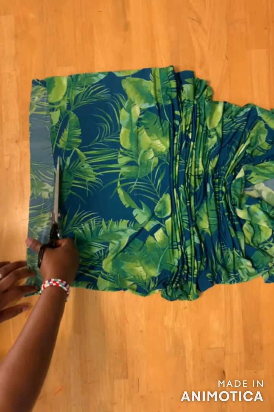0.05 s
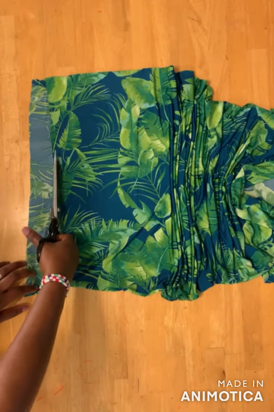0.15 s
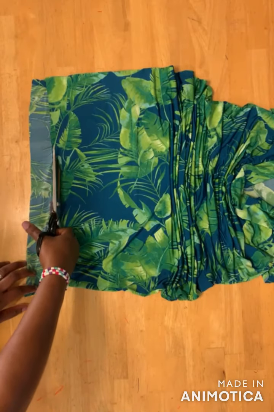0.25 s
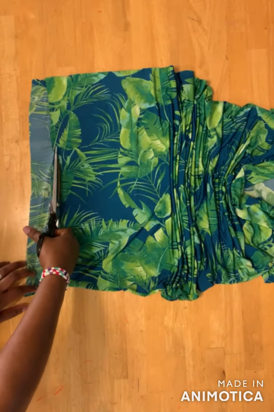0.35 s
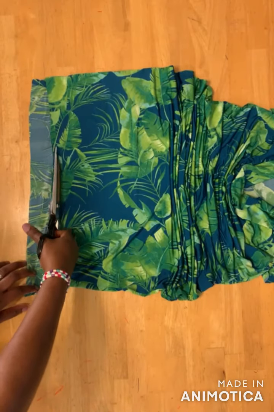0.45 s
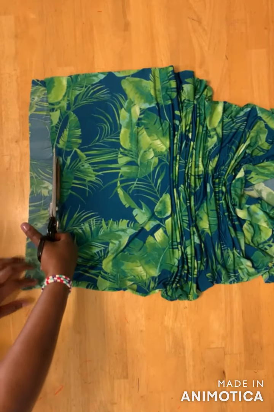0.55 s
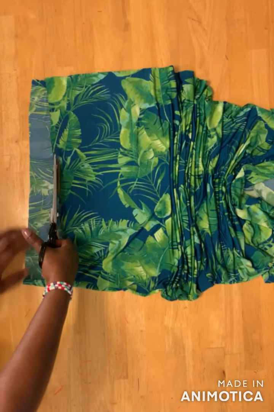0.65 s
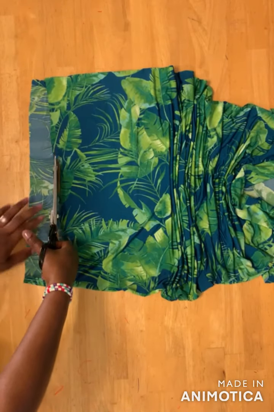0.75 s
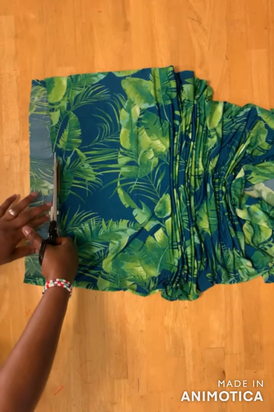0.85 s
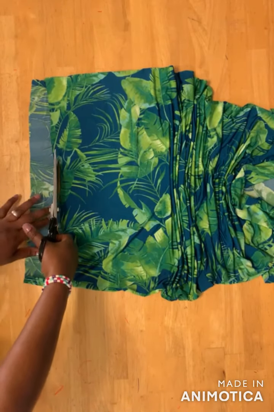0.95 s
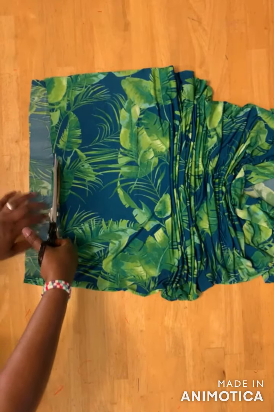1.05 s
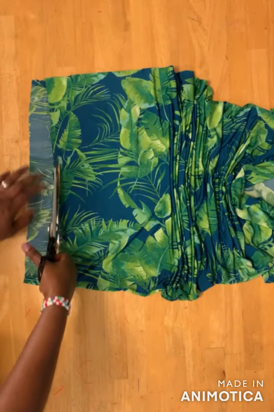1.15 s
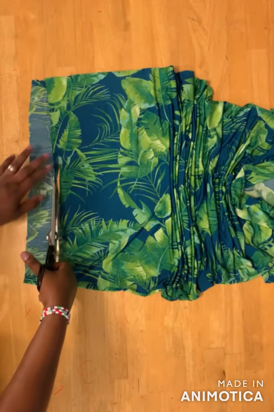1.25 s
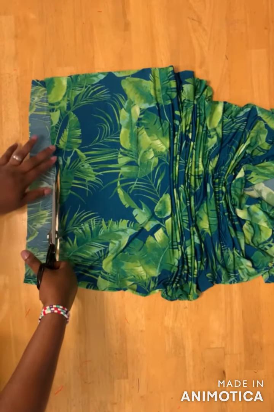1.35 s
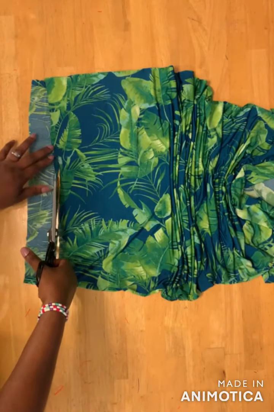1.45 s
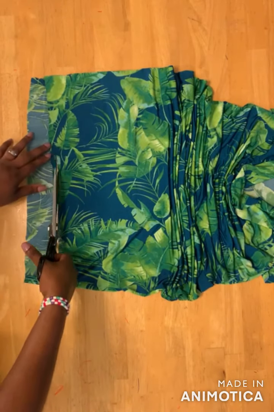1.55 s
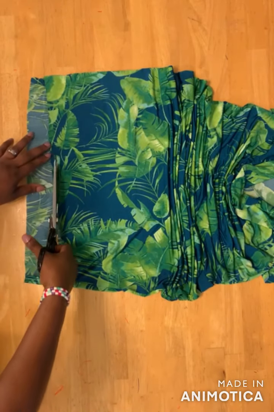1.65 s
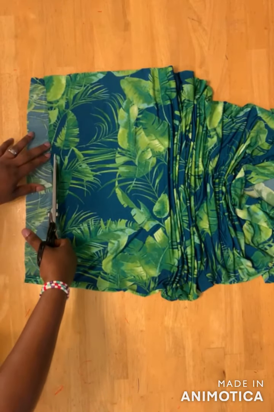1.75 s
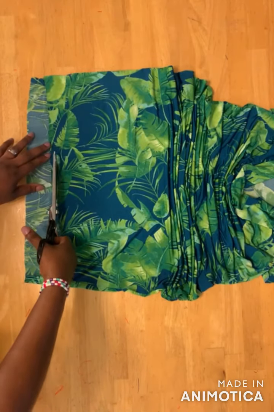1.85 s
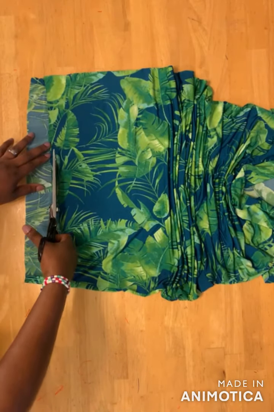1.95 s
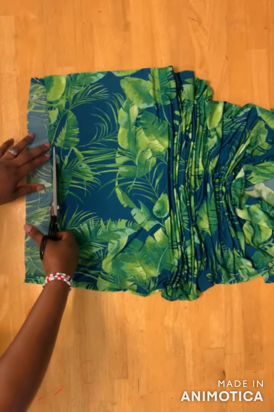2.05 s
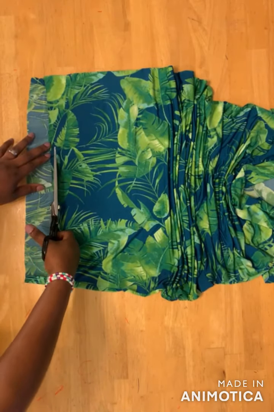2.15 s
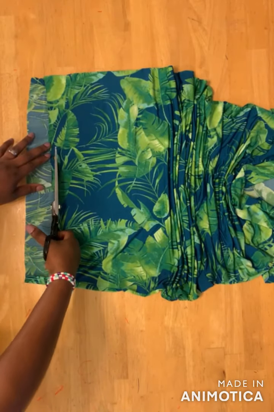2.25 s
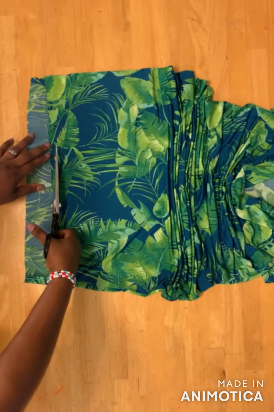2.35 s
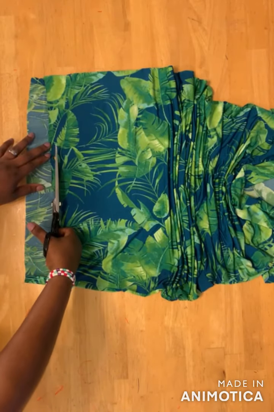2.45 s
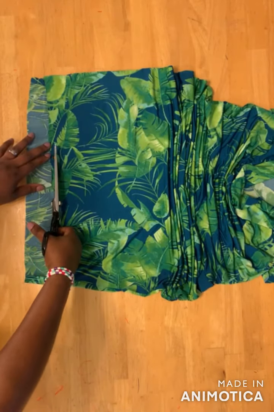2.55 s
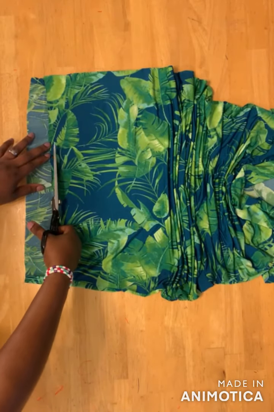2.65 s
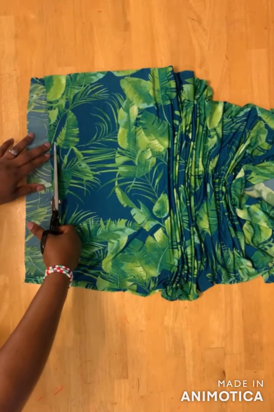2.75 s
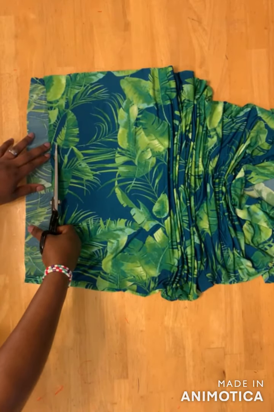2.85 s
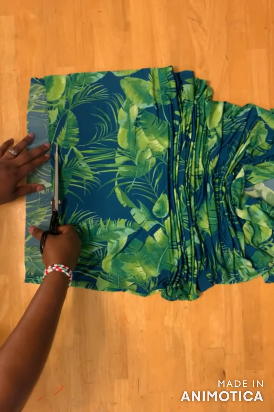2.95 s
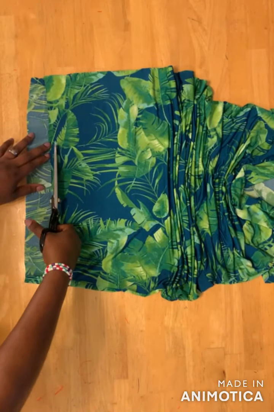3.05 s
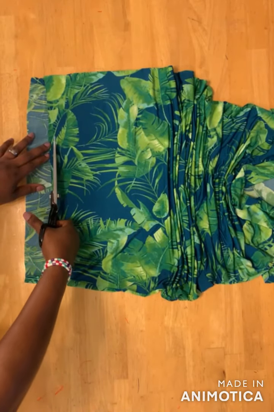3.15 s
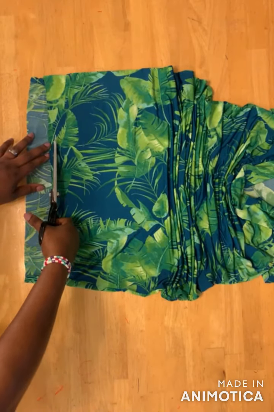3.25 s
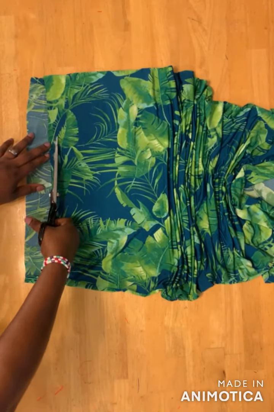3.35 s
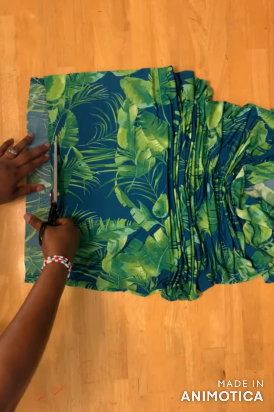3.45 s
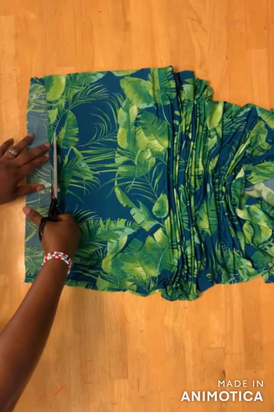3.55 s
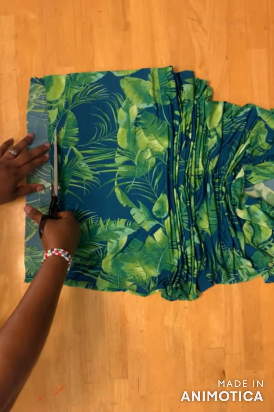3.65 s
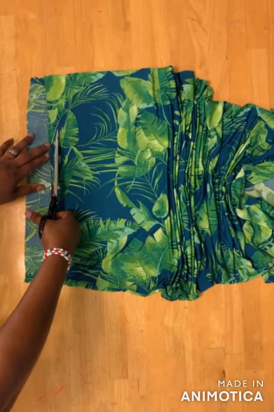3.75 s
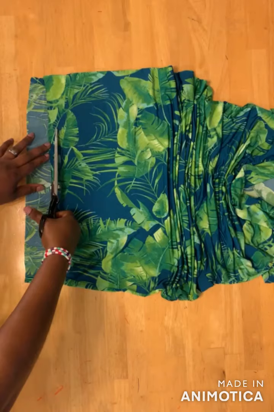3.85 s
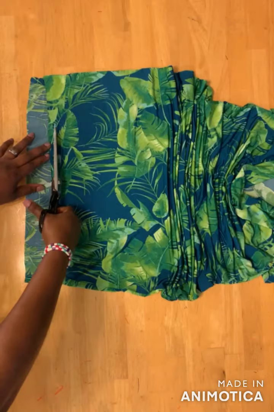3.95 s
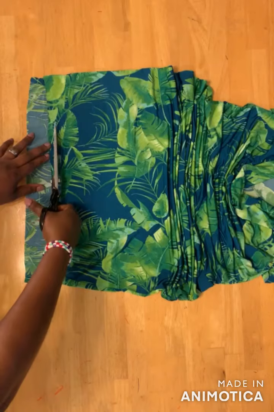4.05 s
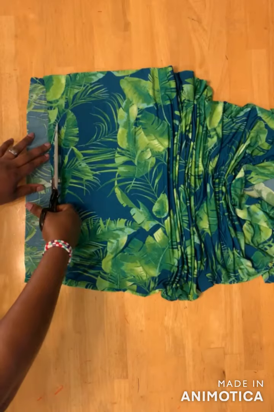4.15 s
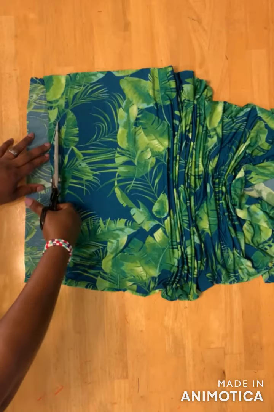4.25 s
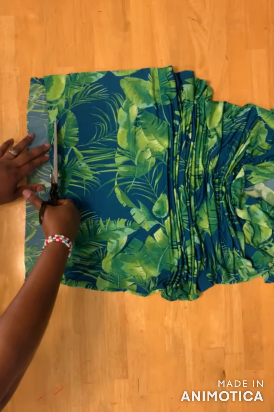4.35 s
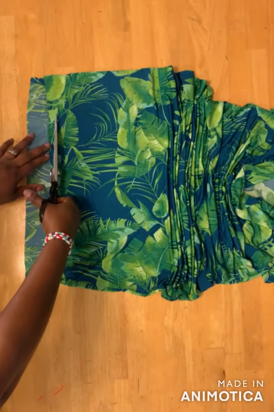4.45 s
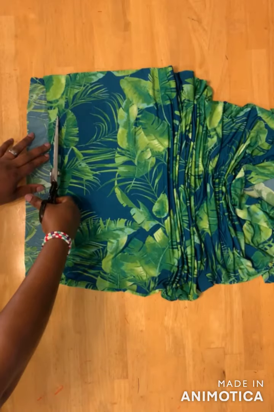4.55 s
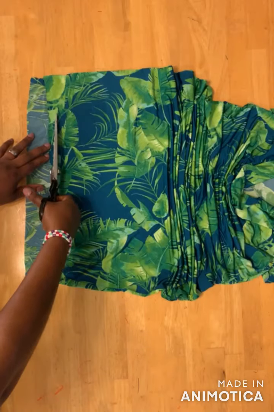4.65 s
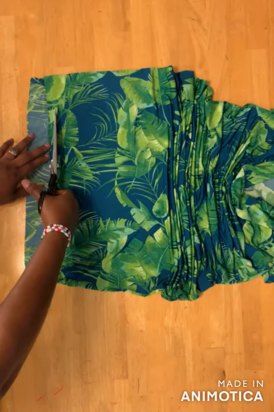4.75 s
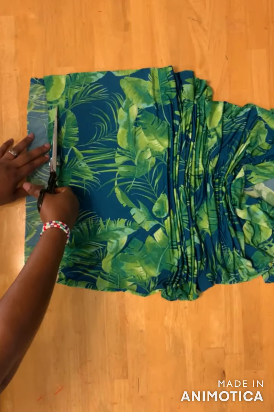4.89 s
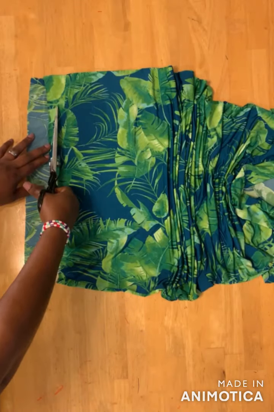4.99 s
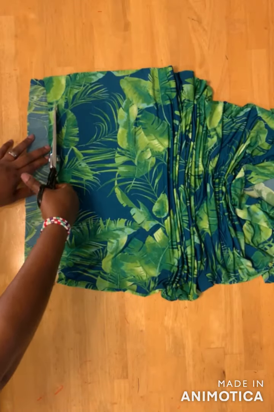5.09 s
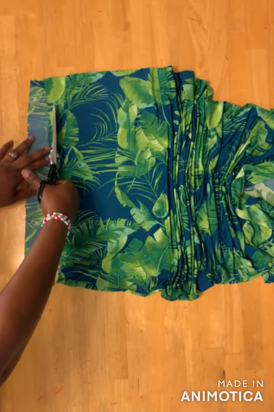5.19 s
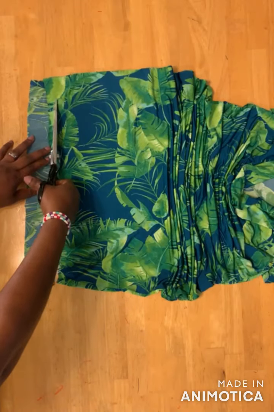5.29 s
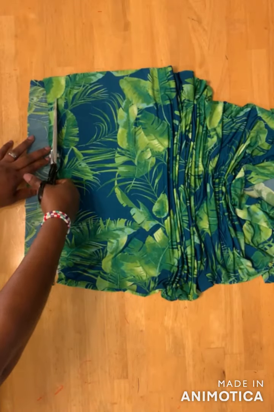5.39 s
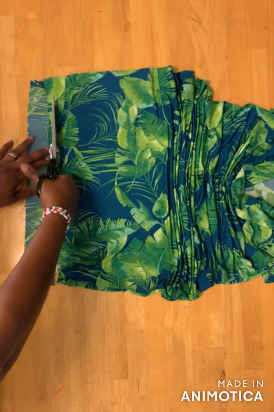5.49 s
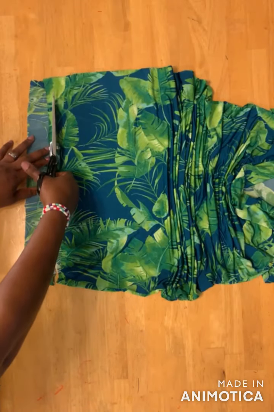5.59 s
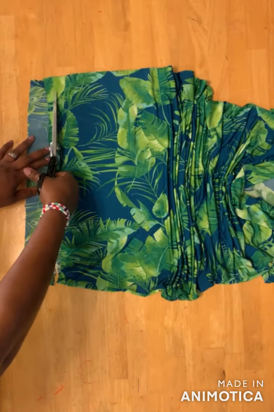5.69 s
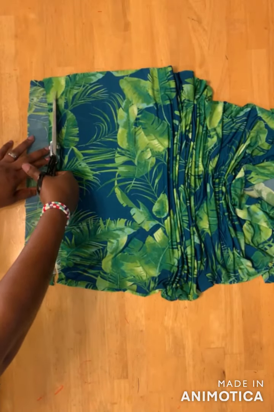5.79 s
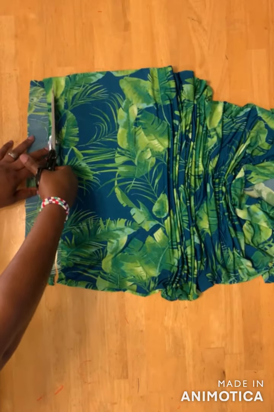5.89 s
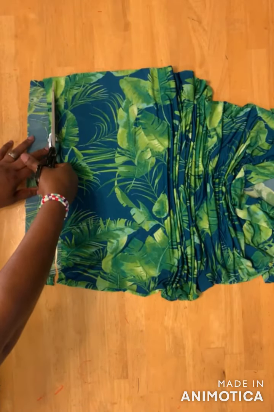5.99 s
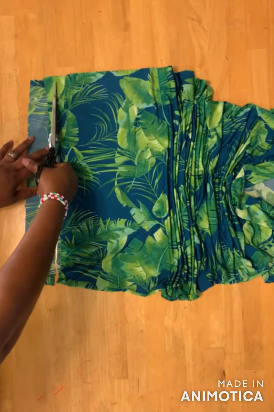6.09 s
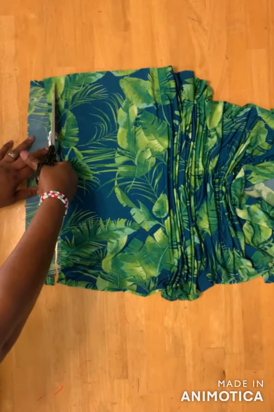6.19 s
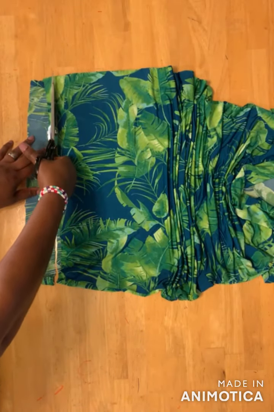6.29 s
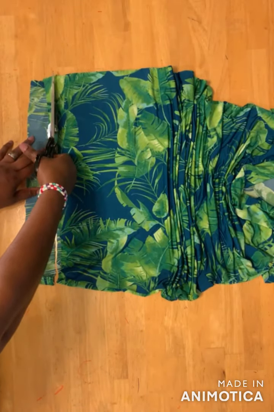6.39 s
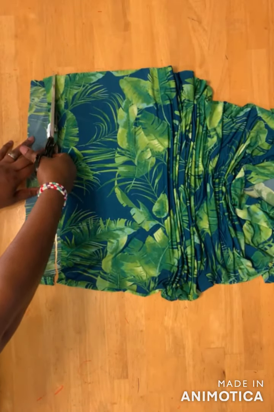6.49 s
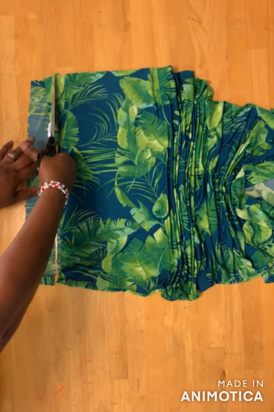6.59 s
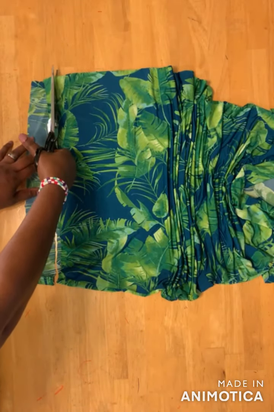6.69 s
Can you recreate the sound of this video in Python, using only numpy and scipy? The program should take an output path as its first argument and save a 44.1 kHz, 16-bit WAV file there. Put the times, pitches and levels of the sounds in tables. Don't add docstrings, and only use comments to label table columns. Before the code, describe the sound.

In a small hard room with a low appliance hum, a tiny metallic scrape is followed by soft hand bumps and faint cloth brushing. After about two seconds, long shears start cutting fabric on a wooden floor: gritty, jerky crunches with woody knocks, each reopening marked by a light pivot tick. Eleven or so strokes run evenly, and the last ends in a hard clack. Close stereo microphone, short room echo.

```python
import sys
import numpy as np
from scipy import signal
from scipy.fft import rfft, irfft, next_fast_len
from scipy.io import wavfile
from scipy.ndimage import uniform_filter1d, map_coordinates

SR = 44100
rng = np.random.default_rng(int(sys.argv[2]) if len(sys.argv) > 2 else 0)


def to_wav(s):
    ch = np.atleast_2d(s).T
    pcm = np.round(np.clip(ch, -1, 1) * 32767)
    wavfile.write(sys.argv[1], SR, pcm.astype(np.int16))


def invert_db(x):
    u = np.asarray(x, float) / 20
    return 10 ** u


N = 296793
TIME = np.arange(N) / SR

# start_s, hold_s, boards_db, blades_db, low_ring_db
CLOSINGS = [(2.314, 0.1, -34.5, -57, -45.5), (2.82, 0.027, -30.5, -46, -59),
            (3.24, 0.0089, -32.5, -46, -55), (3.635, 0.035, -35, -46.5, -43),
            (4.026, 0.019, -33, -47.5, -34), (4.422, 0.018, -34, -48, -42),
            (4.804, 0.013, -35.5, -48.5, -47.5), (5.176, 0.024, -32, -47, -33.5),
            (5.553, 0.026, -29, -47.5, -35.5), (5.954, 0.0062, -32.5, -54, -82),
            (6.37, 0.048, -31, -40.5, -65), (6.501, .01, -20, -52, -39)]
# start_s, hold_s, boards_db, blades_db, squeak_db
OPENINGS = [(0, 0.037, -47, -52, -61), (2.561, 0.029, -42, -57, -69), (2.994, 0.0075, -38, -78, -83),
            (3.386, 0.017, -38.5, -59.5, -61), (3.807, .01, -42, -61, -81),
            (4.191, 0.0099, -39.5, -57.5, -76), (4.557, 0.0081, -54, -52.5, -55),
            (4.947, 0.051, -43.5, -59, -48.5), (5.323, 0.065, -42.5, -55, -46),
            (5.714, 0.074, -46.5, -58.5, -51), (6.155, 0.0088, -40, -47.5, -77)]
CLOSE_RISE = [324, 410, 300, 312]
OPEN_RISE = [526, 700, 400, 900]
CLOSE_FALL = [240, 363, 232, 260]
OPEN_FALL = [185, 300, 204, 700]
SQUEAK_DB, SQUEAK_GROWS = -91, 6
OPEN_RING_DB, OPEN_RING_GROWS = -59.5, 0.69

# start_s, blades_db, boards_db, board_pitch_hz
BITES = [(2.305, -41, -27.5, 500), (2.78, -66, -28.5, 287), (3.197, -63, -26.5, 316),
         (3.607, -55, -24, 344), (3.984, -41.5, -16.5, 604), (4.36, -41, -20, 300), (4.753, -50, -34, 318),
         (5.131, -42.5, -24, 577), (5.512, -45.5, -24.5, 1090), (5.905, -47, -26.5, 560),
         (6.304, -67, -24.5, 324)]
# start_s, blades_db, boards_db, board_pitch_hz
JERKS = [(2.335, -31.5, -21.5, 630), (2.361, -30, -38, 320), (2.404, -32, -22, 798), (2.805, -40, -25, 499),
         (2.819, -46, -26.5, 567), (2.84, -61, -23, 794), (3.22, -43, -31.5, 510), (3.242, -36, -22, 781),
         (3.618, -69, -25.5, 314), (3.631, -38, -28, 322), (3.662, -42, -18.5, 772),
         (4.01, -33.5, -21, 462), (4.039, -38, -22, 880), (4.385, -35.5, -26, 615),
         (4.395, -57, -22.5, 1421), (4.418, -36, -35, 1410), (4.405, -58, -22, 400), (4.432, -55, -23, 424),
         (4.45, -58, -31, 945), (4.786, -34, -28, 1150), (4.795, -44, -20.5, 1448),
         (4.817, -47, -23.5, 526), (5.157, -43, -20, 490), (5.172, -40, -48, 1415),
         (5.19, -52, -26.5, 1090), (5.232, -59, -35, 235), (5.537, -32.5, -16.5, 432),
         (5.566, -31, -25, 920), (5.928, -62, -19.5, 545), (5.94, -64, -25, 1450), (5.961, -65, -18.5, 417),
         (5.972, -68, -18, 1500), (6.342, -55, -33, 520), (6.382, -54, -14.5, 561), (6.393, -57, -18, 1244),
         (6.417, -28, -13.5, 588), (6.442, -60, -26.5, 550), (6.465, -67, -17.5, 350),
         (3.27, -53, -30, 1490), (3.394, -73, -31, 563), (4.564, -68, -28, 1060), (4.998, -65, -40, 1070),
         (6.09, -68, -47, 308), (6.149, -56, -35.5, 1270), (4.735, -84, -48, 503)]
# start_s, blades_db, boards_db, board_pitch_hz
TICKS = [(0.004, -43, -40, 1147), (2.552, -34, -33, 1074), (2.979, -32.5, -28.5, 784),
         (3.382, -37.5, -42, 610), (3.794, -38, -30, 437), (4.17, -34, -31.5, 1250),
         (4.549, -40.5, -32, 810), (4.941, -35.5, -41.5, 1390), (5.31, -42, -29.5, 447),
         (5.708, -36, -38.5, 1160), (6.121, -33.5, -40.5, 314)]
# blade_brightness_db, blade_pitch_hz, board_brightness_db, thud_db
KINDS = [
    (-3.5, 5700, 3, -29),
    (2, 5530, 4, -36),
    (2, 11470, 1, -55),
]
# start_s, peak_db, extra_brightness_db, loudest_pitch_hz
SCRAPES = [(2.294, -47.5, 1, 9800), (2.545, -41, -4, 10500), (.004, -45.5, 13, 10500),
           (.015, -52, 0, 10100), (.044, -51, 7, 7450), (.047, -40, 0, 4700), (3.243, -44, 1, 2980),
           (5.165, -54, 0, 3250), (4.389, -43.5, -14.5, 2440), (0.039, -39, 14.5, 10500),
           (2.25, -64, 4, 9900), (2.829, -49.5, 24, 10500), (2.884, -43, 1, 11100), (3.714, -45, 3, 10700),
           (4.065, -38.5, 5, 7100), (4.444, -51, 21, 11700), (4.995, -39, 0, 10060),
           (5.227, -45.5, 7, 11700), (5.385, -44.5, 10, 5500), (5.403, -38.5, 2, 5280),
           (5.592, -42, 3, 6200), (5.767, -52, -10, 4340), (5.793, -44.5, -3, 5250),
           (5.928, -38.5, -6, 6800), (5.961, -33, -10.5, 3405), (6.169, -35, 16, 11430),
           (6.33, -42.5, 5, 6400), (6.357, -28, 5.5, 9880), (6.366, -38, 2, 10200), (6.465, -29, -13, 5840),
           (6.474, -23.5, -5.5, 10070)]
BOARD_LEAD_S = .002
STEEL_RISE_S = .002
RING_WIDTH_HZ = 30
JOLT_LATE_S, JOLT_MOVING_DB = .004, 3
THUD_FOLLOWS = 0.56

# pitch_hz, level_db
BOARDS = [(60, -9.5), (150, 4), (300, -1), (600, 1.5), (1000, -6), (1500, -4), (1750, -13.5), (2000, -26.5),
          (3000, -86)]
# pitch_hz, width_hz, level_db
BOARD_PEAKS = [(238, 21, 7.5), (333, 19, -1.5), (520, 38, -6), (749.4, 35, 3.5), (1090, 50, 8.5),
               (1390, 33, 6), (1711, 47, -1.5)]
# pitch_hz, level_db
BLADES = [(1500, -12), (2050, -7.5), (2500, -1.5), (3300, -3), (3700, -3.5), (5000, 2.5), (6000, -1.5),
          (7800, -9), (9500, 2.5), (11300, -12), (12200, -22), (13000, -52)]
# pitch_hz, width_hz, level_db
BLADE_PEAKS = [(2440, 70, -2), (3000, 200, 4), (3540, 45, -5.5), (4100, 140, -1), (3202, 48, 8),
               (4200, 310, 3.5), (5170, 38, 6.5), (5690, 76, 2), (6400, 25, -14), (7100, 28, 3.5),
               (8590, 96, 10.5), (9690, 66, -8), (10500, 60, 0.5), (11700, 110, 6.5)]
# pitch_hz, width_hz
RINGS = [
    (943, 8.5),
    (2445, 37),
]

# start_s, peak_db
CLAP = [(6.481, -3)]
# (played at half, at most 0.08 s)
CLAP_MODES = [(243.4, 0, 0.05), (318, -1, 0.057), (400, -5, 0.098), (940, -35.5, 0.48), (1118, -0.5, 0.063),
              (1303, -9, 0.2), (1490, -16.5, 0.49), (1780, 0.5, 0.066), (2500, -48, 0.42),
              (2500, -37, 0.06), (3300, -10, 0.54), (4040, -38, 0.56), (6045, -25, 0.27),
              (7160, -22, 0.086)]
# pitch_hz, level_db
CRACK = [(200, -11), (400, 4.5), (900, -44), (1700, 12), (2500, -22.5), (3500, -10), (6500, -14),
         (9500, -24.5), (11500, -47)]
# pitch_hz, level_db
SHUDDER = [(150, 0.5), (350, -1), (600, -3.5), (850, -17), (1200, 3.5), (1700, 4.5), (2300, -25),
           (3300, -7), (4700, -24), (6000, -21), (9500, -31.5), (11500, -44)]

# start_s, peak_db, pitch_hz, t60_ms
BUMPS = [(0.673, -38.5, 173, 30), (0.706, -44, 260, 130), (0.724, -41.5, 300, 120), (0.749, -48.5, 277, 71),
         (.875, -50.5, 250, 71), (.90, -39, 209.8, 180), (0.936, -41, 258, 117), (1.139, -48, 301, 110),
         (1.519, -48, 1100, 50), (1.694, -46, 290, 90), (1.734, -46, 109, 100)]
# peak_s, level_db
BRUSHES = [(.3, -85.5), (0.61, -56), (.67, -60), (.72, -76), (1.53, -70), (1.59, -55), (2.3, -63)]
BRUSH_RISE, BRUSH_FALL = 1000, 330

# pitch_hz, lead_radians
LEAD = [(200, 0), (350, -.35), (600, -.6), (1030, -.4), (1810, .8), (2070, .9), (2760, 2.2), (3530, 1.5),
        (3960, 2.6), (4500, 3.05), (5080, 3.3), (6290, 6.2), (7490, 6.6), (8350, 9.3), (9560, 9.6),
        (10400, 12.3), (12100, 13.6)]
# pitch_hz, left_minus_right_db
LEAN = [(60, 1), (110, -14), (190, 4.5), (350, -1), (630, 0.5), (1140, -1.0), (2050, -3.5), (3680, 4.5),
        (6640, 3), (12000, 5)]
# pitch_hz, t60_s
ROOM = [(150, 0.39), (1000, 0.29), (3000, 0.28), (6000, 0.16), (11000, 0.14)]
# pitch_hz, level_db
WET = [(100, 0.5), (500, 2), (1500, 6), (4000, -2), (10000, 0.5)]
# pitch_hz, share_0_to_1
ROOM_ALIKE = [(100, 1), (300, 1), (700, 0.18), (2000, 0), (4000, 0.2), (12000, 0)]

# pitch_hz, width_hz, level_db
HUM = [(59.1, 9, -56.5), (123.2, 8, -63.5), (246.4, 7, -59), (290, 41, -59), (1090, 21, -75.5),
       (1228, 54, -74)]
# pitch_hz, level_db_per_hz
AIR = [(25, -41), (40, -19), (52, -10), (90, -11.5), (130, -7), (190, -10.5), (260, -5), (350, -9),
       (500, -14.5), (800, -26), (1150, -26.5), (1600, -32), (2200, -42), (3000, -56)]
AIR_DB, AIR_SWAY_DB = -53.5, 1.2
# pitch_hz, likeness
AIR_ALIKE = [(60, 1), (130, 1), (270, 1), (580, 0.38), (1240, -0.79), (2630, 0.11), (5610, 0.028),
             (12000, -0.2)]
# pitch_hz, level_db
HISS = [(1200, -9), (2000, -13.5), (3500, -2.5), (5000, -8.5), (7000, -9), (9000, -20.5), (11000, -8.5),
        (12500, -16)]


def shears():
    s, blade_db, board_db, board_hz, blade_tilt, blade_hz, board_tilt, _ = all_slips()
    shoves = np.transpose([s, board_db, board_tilt, board_hz]) + [-BOARD_LEAD_S, -8.5, 0, 3]
    jerks = np.array(sorted([*zip(s, blade_db, blade_tilt, blade_hz), *SCRAPES])) + [0, -6.5, 5, 5]
    force = strokes()
    boards = slipping(invert_db(-15.0) * force[0], shoves, rise=0.0054, swell=0.0071, t60=0.075,
                      split_hz=2000, rate=2500, spread_db=2.5, mode_db=10.5, sharp=13.4,
                      knock_db=11.5, ring_db=7.5)
    blades = slipping(invert_db(-7.5) * force[1], jerks, rise=STEEL_RISE_S, swell=0.0027, t60=0.048,
                      split_hz=6450, rate=21000, spread_db=3.0, mode_db=7, sharp=32,
                      knock_db=-12, ring_db=13)
    rings = sum(through(invert_db(-5) * gain * rng.standard_normal(N), lambda f: resonance(f, hz, width))
                for gain, (hz, width) in zip(force[2:], RINGS))
    wood = patches(through(boards, body(BOARDS, BOARD_PEAKS)), depth_db=4.5)
    steel = patches(through(blades, body(BLADES, BLADE_PEAKS)), depth_db=4.5)
    return wood + steel + rings + thuds()


def strokes():
    s, hold, *closing = np.transpose(CLOSINGS)
    at, stay, *opening = np.transpose(OPENINGS)
    closing.append(SQUEAK_DB + SQUEAK_GROWS * s)
    opening.insert(2, OPEN_RING_DB + OPEN_RING_GROWS * at)
    forces = []
    for k in range(4):
        squeak = k == 3
        start = at + stay if squeak else at
        length = 0 * stay if squeak else stay
        shut = swells(s, hold, closing[k], CLOSE_RISE[k], CLOSE_FALL[k])
        opened = swells(start, length, opening[k], OPEN_RISE[k], OPEN_FALL[k])
        forces.append((shut + opened) * (TIME < CLAP[0][0]))
    return forces


def all_slips():
    rows = [row + kind for table, kind in zip((BITES, JERKS, TICKS), KINDS) for row in table]
    return np.transpose(sorted(rows))


def slipping(steady, events, rise, swell, t60, split_hz, rate, spread_db, mode_db, sharp, knock_db, ring_db):
    snaps = np.pad(threads(rate, spread_db), (0, SR))
    t = np.arange(SR // 6) / SR
    s, db, tilt_db, hz = events.T[:, :, None]
    moving = np.diff(s, prepend=-1, axis=0) < .075
    shape = invert_db(db - 60 * t / t60) * (1 - np.exp(-t / np.where(moving, swell, rise)))
    bursts = shape * snaps[np.round((s + t) * SR).astype(int)]
    late = round(JOLT_LATE_S * SR)
    bursts[:, late:late + 1] += invert_db(db + knock_db + JOLT_MOVING_DB * moving)

    def colour(f):
        tilt = invert_db(tilt_db * np.tanh(2 * np.log(f / split_hz + 1e-3)))
        favourite = invert_db(mode_db) * resonance(f, hz, hz / sharp)
        ringing = moving * invert_db(ring_db) * resonance(f, hz, RING_WIDTH_HZ)
        return tilt * (1 + favourite + ringing)

    return steady * snaps[:N] + laid(s[:, 0], filtered(bursts, colour))


def threads(rate, spread_db):
    chance, sign, size = rng.random((3, N))
    return unit((chance < rate / SR) * np.sign(sign - .5) * invert_db(-spread_db * np.log(size + .01)))


def patches(x, depth_db):
    z = signal.stft(x, nperseg=512)[2]
    field = uniform_filter1d(rng.standard_normal(z.shape[-2:]), size=3, axis=0)
    field = uniform_filter1d(field, size=7, axis=1)
    return signal.istft(z * invert_db(depth_db * unit(field)), nperseg=512)[1][..., :N]


def thuds():
    s, _, db, *_, thud_db = all_slips()[:, :, None]
    t = np.arange(SR // 8) / SR
    fade = invert_db(THUD_FOLLOWS * db + thud_db + 3.0 - 60 * t / 0.099)
    puffs = fade * rng.standard_normal((len(s), len(t)))
    return through(laid(s[:, 0], puffs), lambda f: resonance(f, 64, 75) * resonance(f, 146, 70))


def clap():
    out = np.zeros(N + SR)
    t = np.arange(SR // 4) / SR
    for s, db in CLAP:
        ring = sum(invert_db(level - 60 * t / min(t60 / 2, .08)) * np.sin(2 * np.pi * hz * t)
                   for hz, level, t60 in CLAP_MODES)
        crack = through(invert_db(-60 * t / 0.019) * rng.standard_normal(len(t)), lambda f: invert_db(along(CRACK, f)))
        rattle = through(rng.standard_normal(len(t)), lambda f: invert_db(along(SHUDDER, f)))
        rattle = invert_db(-60 * t / 0.38) * rattle
        after = (invert_db(db - 7.0) * ring + invert_db(db - 25.5) * rattle) * (1 - np.exp(-t / 0.0022))
        out[round(s * SR):][:len(t)] += after + invert_db(db - 2.5) * crack
    return out[:N]


def hand():
    s, db, hz, t60_ms = np.transpose(BUMPS)[:, :, None]
    t = np.arange(SR // 4) / SR
    drift = .03 * np.cumsum(rng.standard_normal((len(s), len(t))), axis=1)
    fade = invert_db(db + 3.0 - 60000 * t / t60_ms) * (1 - np.exp(-t / 0.00092))
    bumps = fade * np.sin(2 * np.pi * hz * t + drift)
    soft = filtered(laid(s[:, 0], bumps), lambda f: 1 / (1 + (f / 1300) ** 6))
    at, brush_db = np.transpose(BRUSHES)
    stroking = swells(at, 0 * at, brush_db, BRUSH_RISE, BRUSH_FALL)
    cloth = invert_db(-13.0) * stroking * rng.standard_normal(N)
    return soft + through(cloth, lambda f: invert_db(along(BLADES, f) - 7.8 * np.log2(f / 2000 + 1)))


def ports(x):
    return filtered(x, lambda hz: np.array([left_port(hz), 1 / left_port(hz)]))


def left_port(hz):
    log_gain = np.log(invert_db(along(LEAN, hz))) + 1j * np.interp(hz, *np.transpose(LEAD))
    return np.exp(log_gain / 2 * hz / (hz + 150))


def room(x):
    out = np.zeros((2, N + SR))
    step = SR // 3
    for start in range(0, N, step):
        hz, t, z = signal.stft(rng.standard_normal((2, SR // 2)), SR, nperseg=256)
        turn = np.arccos(np.clip(along(ROOM_ALIKE, hz), -.95, .95))[:, None] / 2
        mid, side = z[0] * np.cos(turn), z[1] * np.sin(turn)
        port = left_port(hz)[:, None]
        pair = np.array([(mid + side) * port, (mid - side) / port])
        fade = invert_db(-60 * t / along(ROOM, hz)[:, None])
        tail = signal.istft(pair * fade, SR, nperseg=256)[1]
        wet = signal.fftconvolve(x[None, start:start + step], tail / np.linalg.norm(tail[0]), axes=1)
        late = start + 200
        out[:, late:late + wet.shape[1]] += wet
    return out[:, :N]


def room_tone():
    wobble = map_coordinates(rng.standard_normal(60), [TIME * 7])

    def air_colour(hz):
        turn = np.arccos(np.clip(along(AIR_ALIKE, hz), -.8, 1)) / 2
        return invert_db(along(AIR, hz)) * [np.ones_like(hz), np.tan(turn)]

    def hum_lines(f):
        return sum(invert_db(db) * np.sqrt(SR / 2 / width) * abs(resonance(f, hz, width)) ** 2
                   for hz, width, db in HUM)

    mid, side = filtered(patches(rng.standard_normal((2, N)), depth_db=1.0), air_colour)
    air = invert_db(AIR_DB - 4.5 + AIR_SWAY_DB * wobble) * np.array([mid + side, mid - side]) / mid.std()
    hum, apart = filtered(rng.standard_normal((2, N)), hum_lines)
    return air + hum + invert_db(-19) * apart * [[1], [-1]]


def hiss():
    return invert_db(-83) * patches(through(rng.standard_normal(N), lambda f: invert_db(along(HISS, f))), depth_db=0.5)


def swells(s, hold, db, rise, fall):
    s, hold, db = [np.reshape(v, (-1, 1)) for v in (s, hold, db)]
    late = TIME - s
    below_db = np.maximum(0, np.maximum(-late * rise, (late - abs(hold)) * fall))
    return invert_db(db - below_db).sum(axis=0)


def laid(times, rows):
    at = np.round(times * SR).astype(int)[:, None] + np.arange(rows.shape[1])
    return np.bincount(at.ravel(), rows.ravel(), N + SR)[:N]


def unit(x):
    return x / np.sqrt(np.mean(x ** 2) + 1e-20)


def along(points, hz):
    f, v = np.transpose(points)
    return np.interp(np.log(hz + 1), np.log(f + 1), v)


def filtered(x, response):
    m = next_fast_len(x.shape[-1] + 3000)
    return irfft(rfft(x, m) * response(np.fft.rfftfreq(m, 1 / SR)), m)[..., :x.shape[-1]]


def through(x, response):
    scale = np.sqrt(np.mean(abs(response(np.linspace(1, SR / 2, 9000))) ** 2))
    return filtered(x, response) / scale


def resonance(f, hz, width):
    return 1j * f * width / (hz * hz - f * f + 1j * f * width)


def body(spectrum, peaks):
    return lambda f: invert_db(along(spectrum, f)) * (
        1 + sum(invert_db(db) * resonance(f, hz, width) for hz, width, db in peaks))


def scene():
    near = shears() + clap() + hand()
    echo = invert_db(-6.0) * room(filtered(near, lambda f: invert_db(along(WET, f))))
    return ports(near + hiss()) + echo + room_tone()


def top_cut(x):
    return signal.sosfilt(signal.butter(12, 12550, fs=SR, output="sos"), x)


def record(dry):
    heard = filtered(dry, lambda f: 1 / (1 + (f / 11900) ** 16))
    return top_cut(heard)


dry = scene()
out = record(dry)
to_wav(out)
```